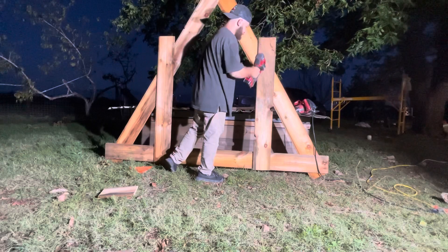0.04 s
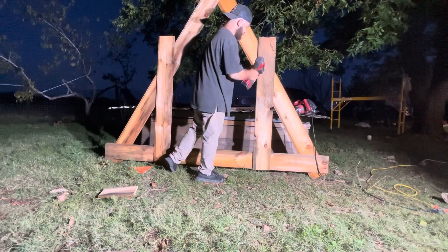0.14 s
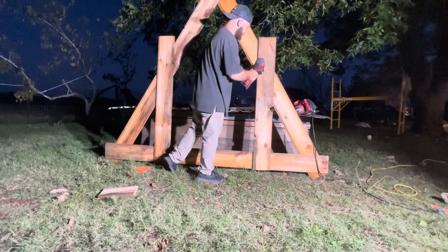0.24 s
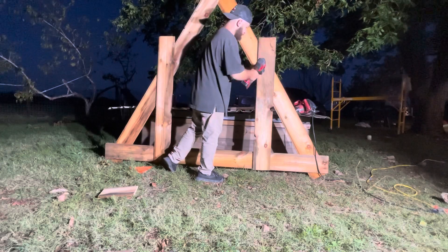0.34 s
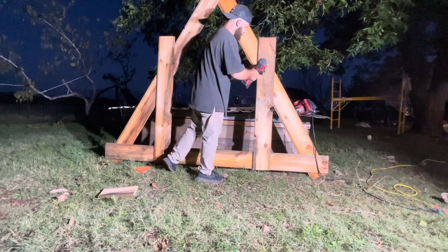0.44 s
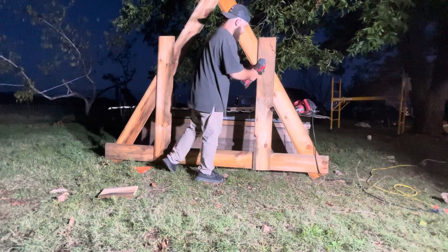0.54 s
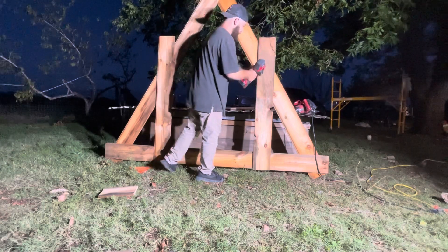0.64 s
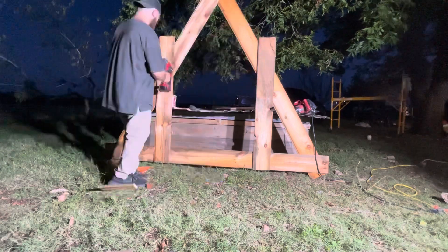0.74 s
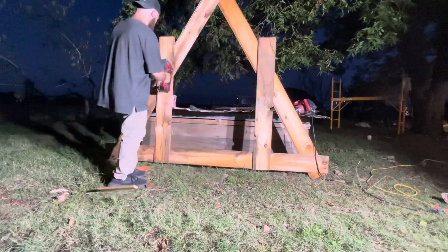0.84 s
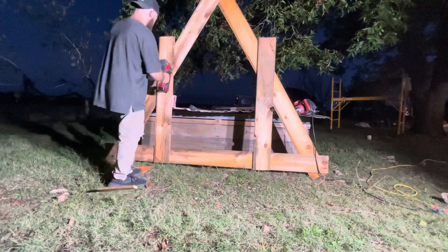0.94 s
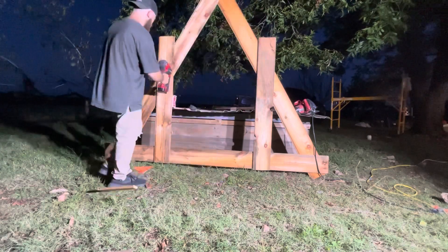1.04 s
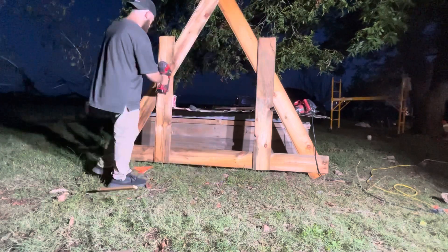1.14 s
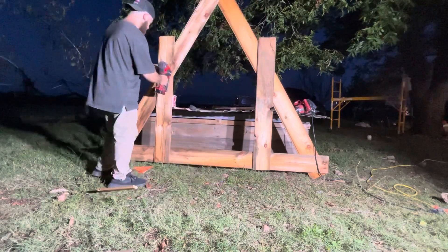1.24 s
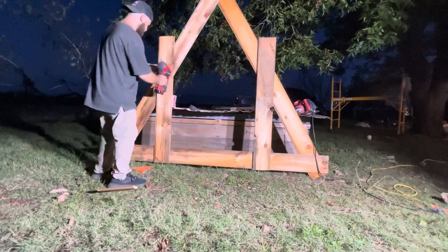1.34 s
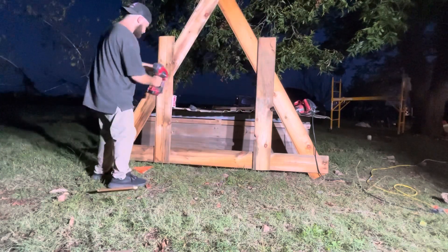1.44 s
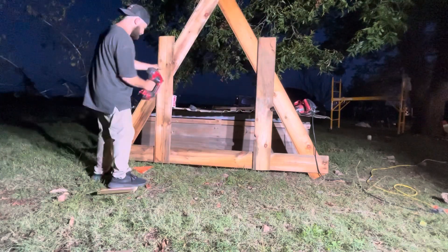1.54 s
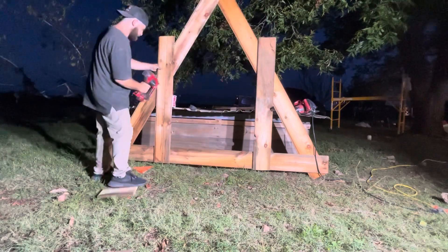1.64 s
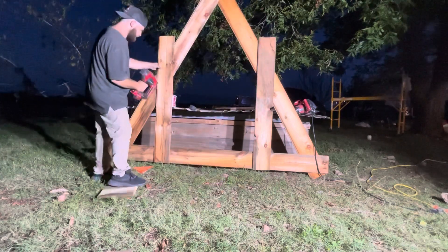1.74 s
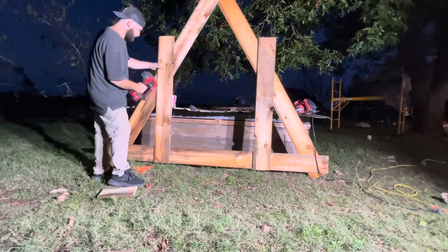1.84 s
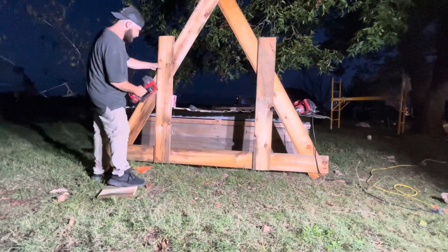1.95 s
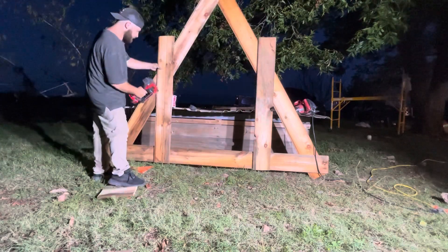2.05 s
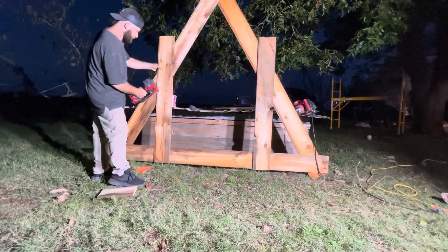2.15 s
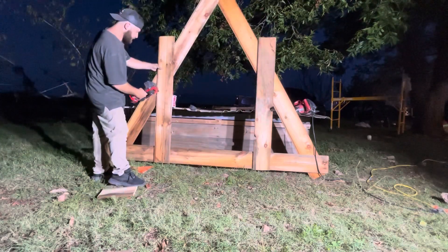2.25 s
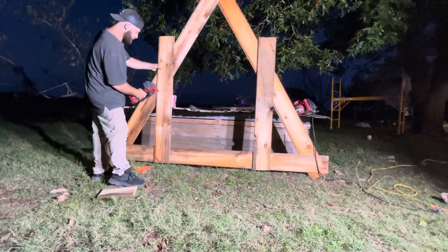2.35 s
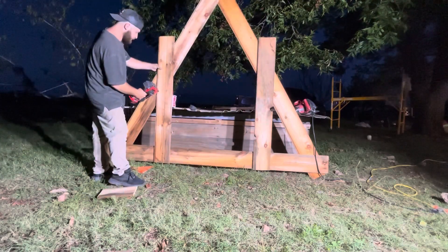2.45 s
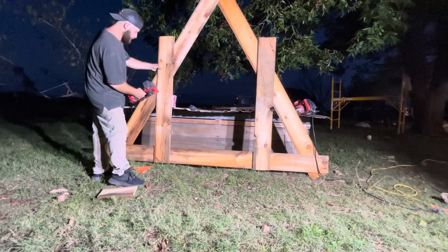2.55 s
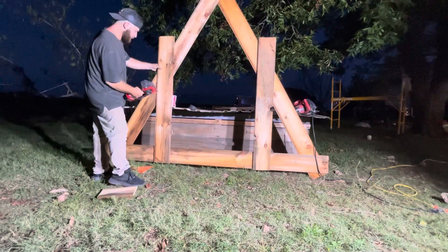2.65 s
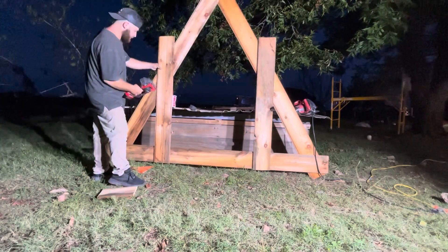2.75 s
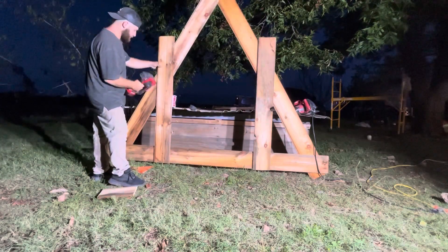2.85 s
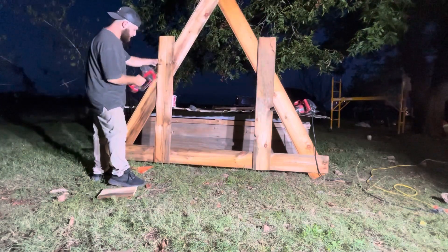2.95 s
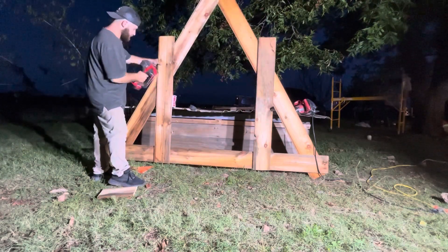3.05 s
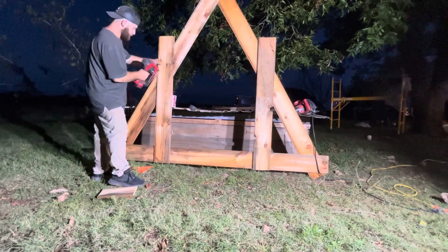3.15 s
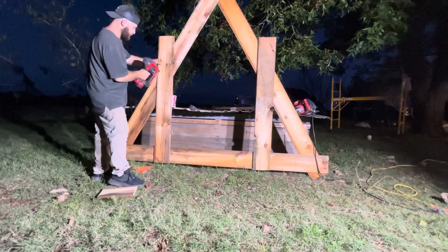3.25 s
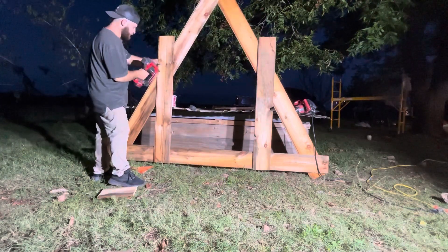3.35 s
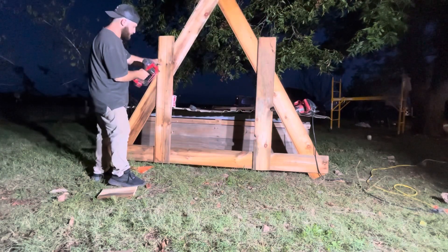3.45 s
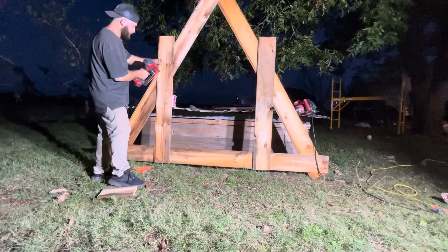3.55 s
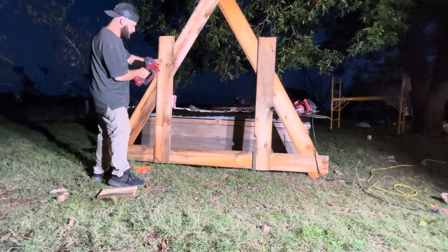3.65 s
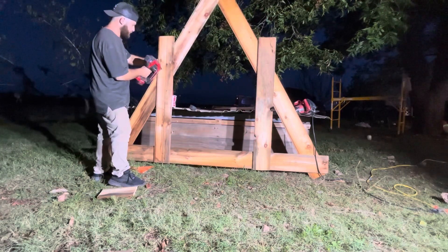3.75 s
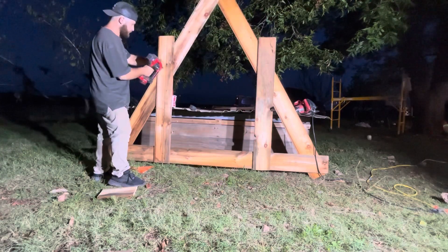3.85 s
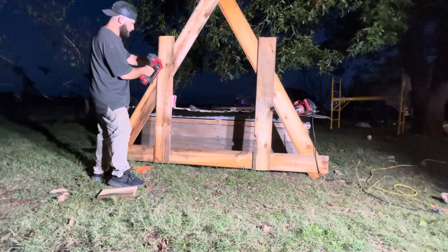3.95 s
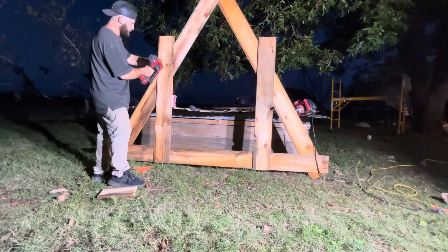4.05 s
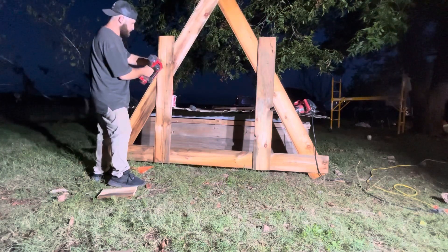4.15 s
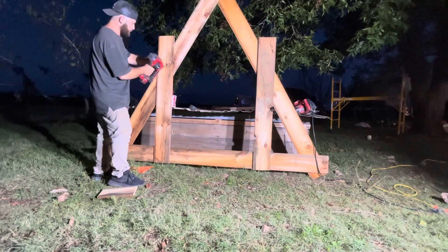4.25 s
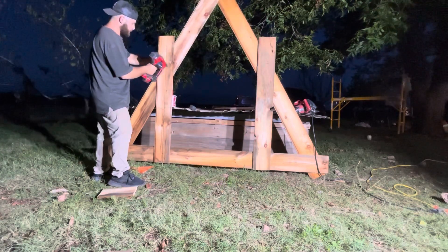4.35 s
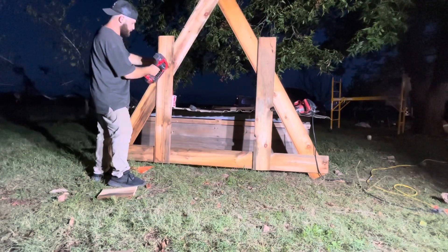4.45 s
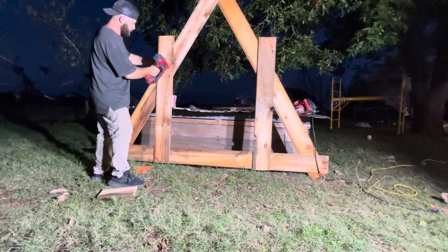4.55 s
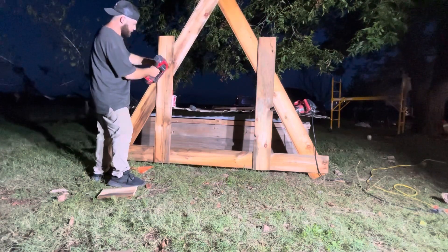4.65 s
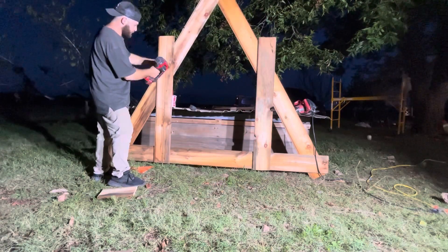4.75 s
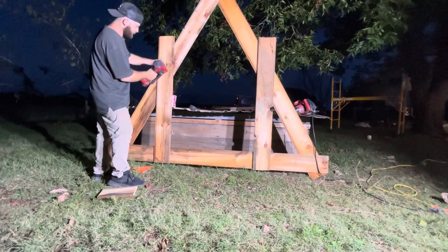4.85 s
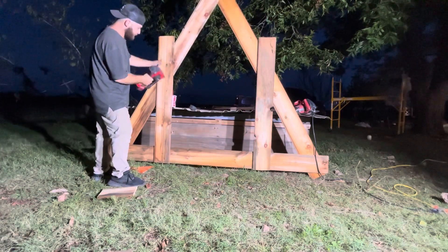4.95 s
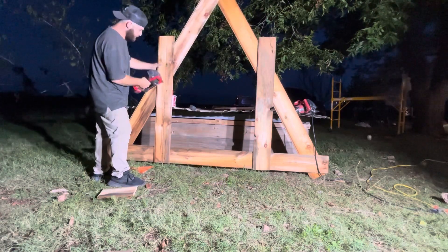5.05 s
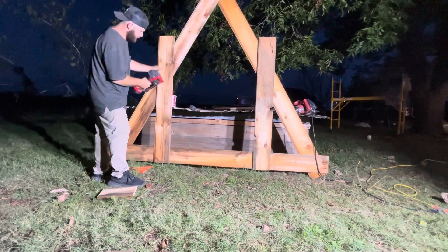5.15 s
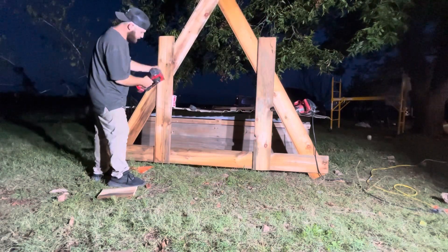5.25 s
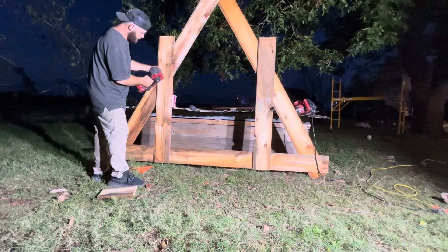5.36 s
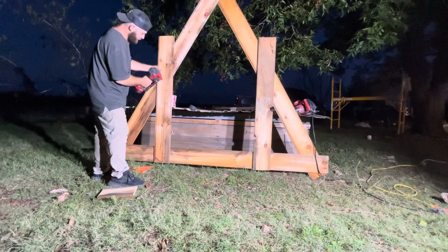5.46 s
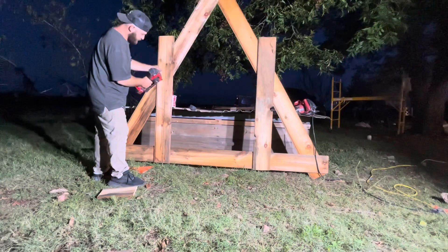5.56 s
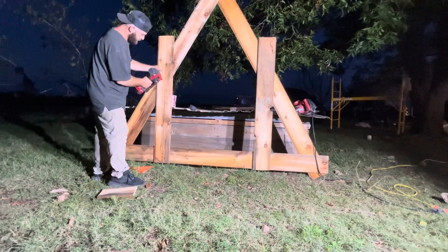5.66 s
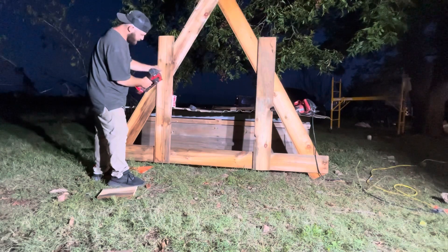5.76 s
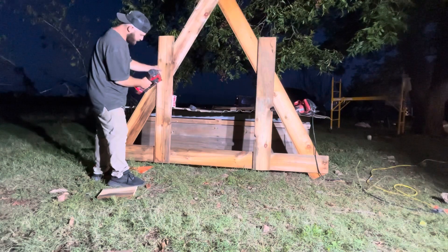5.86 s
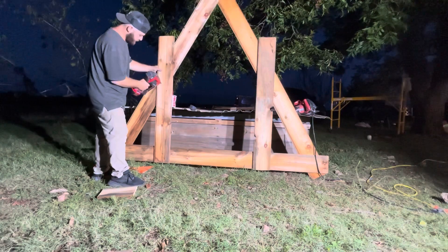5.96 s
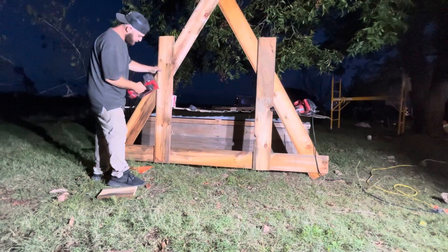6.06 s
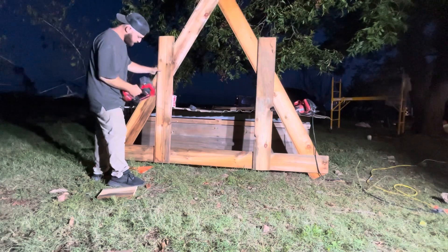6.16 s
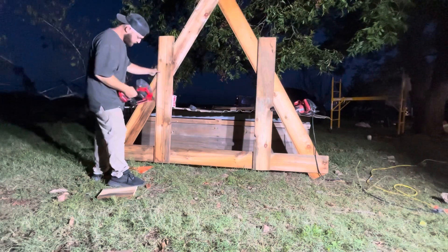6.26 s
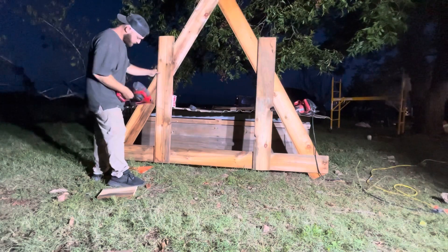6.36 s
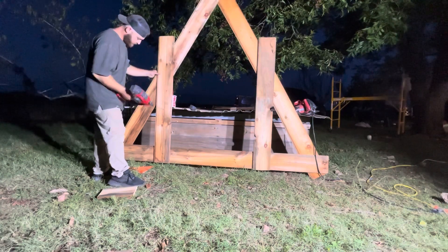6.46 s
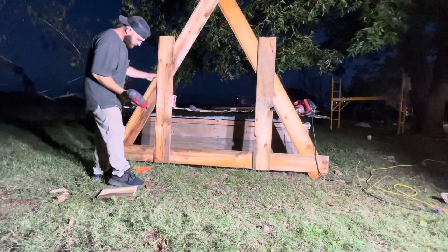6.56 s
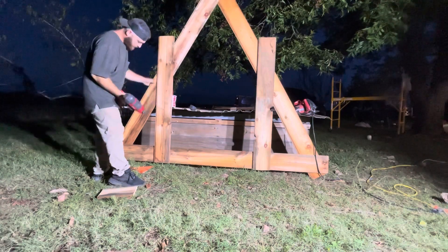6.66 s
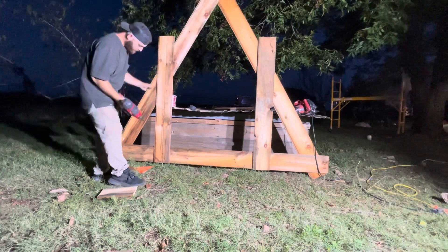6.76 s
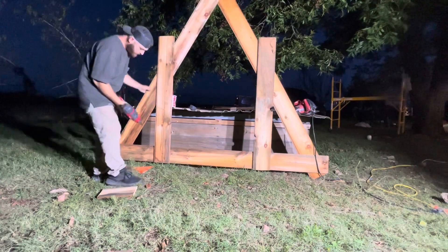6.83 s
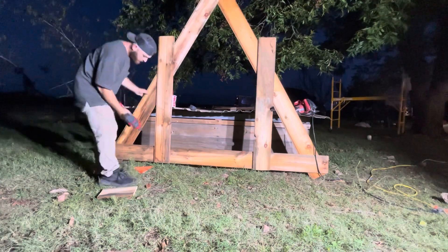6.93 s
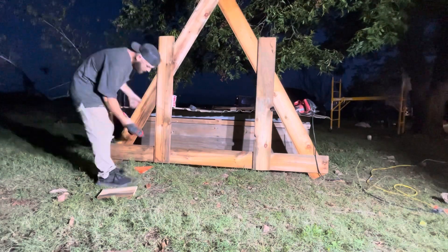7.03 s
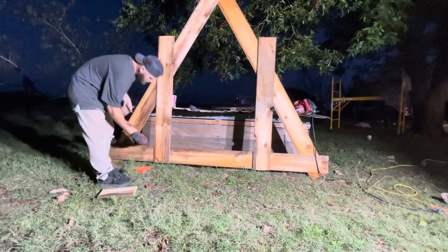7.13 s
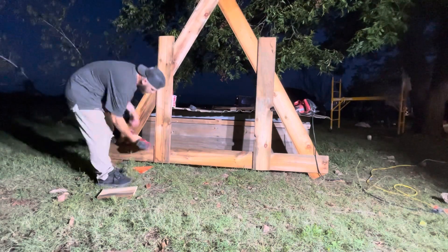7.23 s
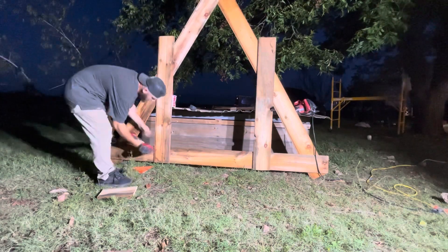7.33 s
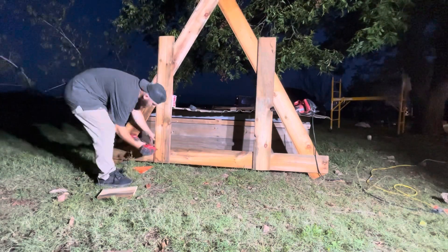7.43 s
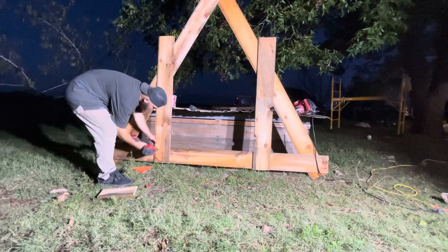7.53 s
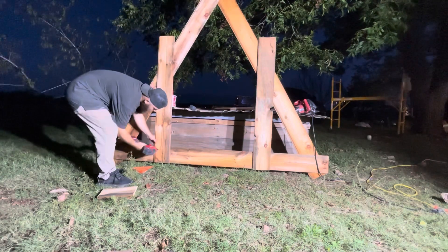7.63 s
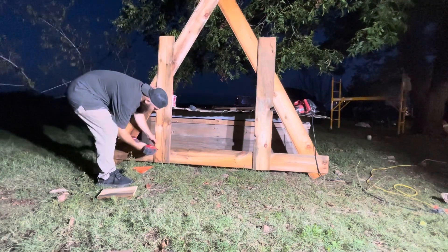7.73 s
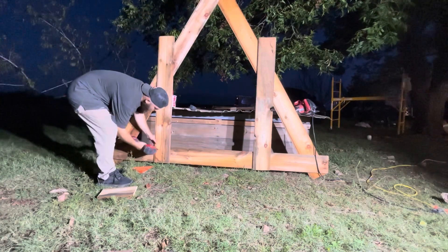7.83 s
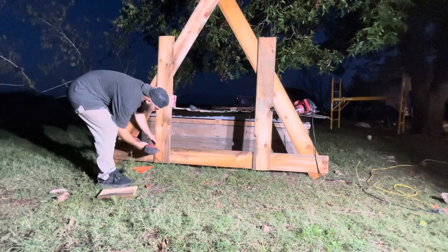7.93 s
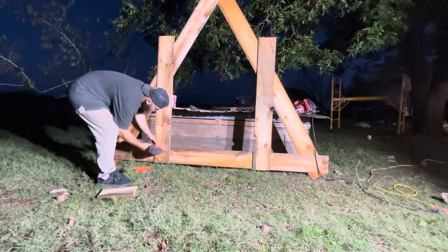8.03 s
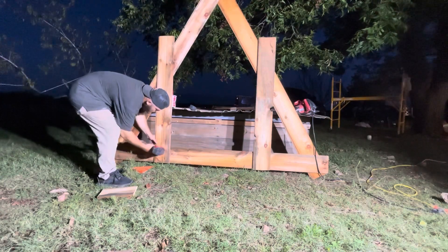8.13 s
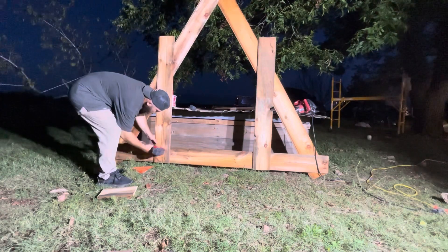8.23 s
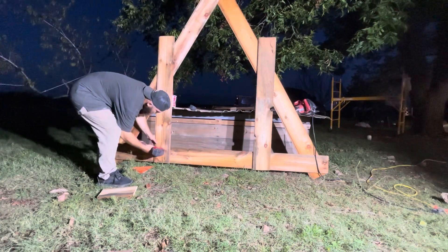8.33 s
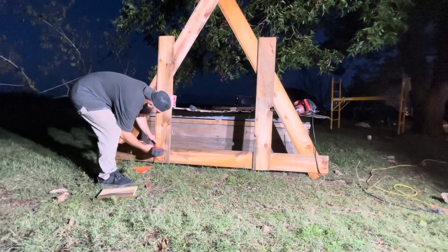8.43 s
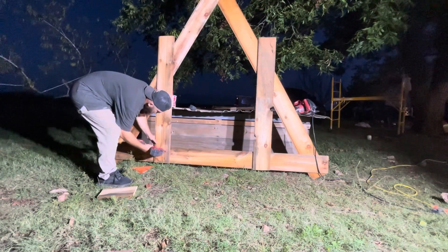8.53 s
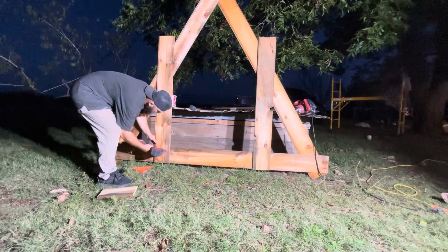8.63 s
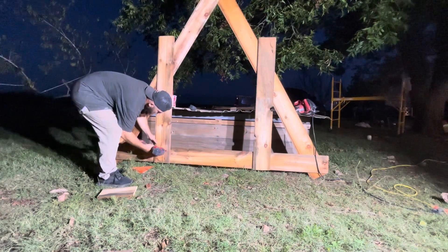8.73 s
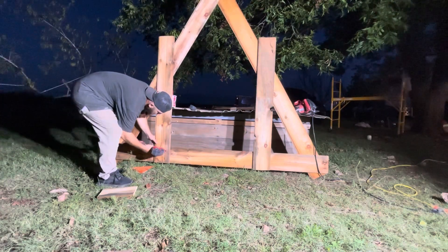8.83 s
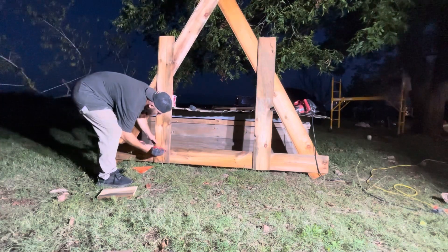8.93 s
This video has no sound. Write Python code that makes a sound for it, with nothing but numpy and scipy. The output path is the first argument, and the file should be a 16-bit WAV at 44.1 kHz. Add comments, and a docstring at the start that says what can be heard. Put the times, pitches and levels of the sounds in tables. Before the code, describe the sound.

Cordless nailer drives nails into a wooden frame in a yard: clack, climbing whirr, hard crack, rattle, dying hiss, faint distant insects.

```python
"""A yard at night: a battery nail gun works along a timber frame, insects trill far off.
Each cycle: nose clack, motor whine climbing, a shot of shaped noise and struck modes, rattle, flywheel hiss dying.
Contacts ring decaying sines of steel and timber; whirr, shudder and night are filtered noise."""
import sys
import numpy as np
from scipy import signal
from scipy.fft import rfft, irfft, next_fast_len
from scipy.io import wavfile
from scipy.ndimage import uniform_filter1d, map_coordinates

SR = 44100
rng = np.random.default_rng(int(sys.argv[2]) if len(sys.argv) > 2 else 0)


def master(y):
    """Save y as 16-bit WAV."""
    cut = np.clip(np.atleast_2d(y).T, -1, 1)
    pcm = np.round(cut * 32767)  # scale
    wavfile.write(sys.argv[1], SR, pcm.astype(np.int16))


N = 396459
T = np.arange(SR // 2) / SR  # s, time axis of one event


def amp(db):
    """dB to amplitude factor."""
    return 10 ** (np.asarray(db) / 20)


def unit(x):
    """x at rms 1."""
    return x / np.sqrt(np.mean(x ** 2) + 1e-20)


def along(points, hz):
    """Interpolates (f/Hz, value) points on a log frequency axis."""
    f, v = np.transpose(points)
    return np.interp(np.log(hz + 1), np.log(f + 1), v)


def wobble(rate_hz, count=N):
    """Smooth random curve, rate_hz knots a second."""
    knots = rng.standard_normal(int(count * rate_hz / SR) + 4)
    return map_coordinates(knots, [np.arange(count) * rate_hz / SR])


def filtered(x, response):
    """Multiplies the spectrum of x by response(Hz)."""
    m = next_fast_len(x.shape[-1] + 8192)
    return irfft(rfft(x, m) * response(np.fft.rfftfreq(m, 1 / SR)), m)[..., :x.shape[-1]]


LEVEL_HZ = 12500  # spectra are flat above this


def noise(spectrum, count=N):
    """Two unrelated noises of one colour, rms 1."""
    colour = lambda hz: amp(along(spectrum, np.minimum(hz, LEVEL_HZ)))
    return unit(filtered(rng.standard_normal((2, count)), colour))


def patchy(x, depth_db):
    """Random gain in small patches of time and frequency."""
    z = signal.stft(x, nperseg=512)[2]
    field = uniform_filter1d(rng.standard_normal(z.shape[1:]), size=3, axis=0)
    field = uniform_filter1d(field, size=10, axis=1)
    return unit(signal.istft(z * amp(depth_db * unit(field)), nperseg=512)[1][:, :N])


def ring(modes, attack_s, detune=0.0044, count=len(T)):
    """Struck modes as decaying sines, strength and pitch redrawn at every blow."""
    t = T[:count]
    strength_db, shift = rng.standard_normal((len(modes), 2)).T * [[2.5], [detune]]
    tones = 0
    for (hz, db, t60), more_db, bend in zip(modes, strength_db, shift):
        tones = tones + amp(db + more_db - 60 * t / t60) * np.sin(2 * np.pi * hz * (1 + bend) * t)
    return tones * (1 - np.exp(-t / attack_s))


def add(track, s, sound):
    """Lays a sound into the track at s seconds."""
    part = track[:, max(round(s * SR), 0):][:, :sound.shape[-1]]
    part += (np.ones((2, 1)) * sound)[:, :part.shape[1]]


GRIP_S, DRIVE_S = .015, .011  # driver grips the flywheel before meeting the nail; stroke into the wood
# noise colour of the drive: f/Hz, level/dB
BLAST_SPECTRUM = [(88, -50), (150, -17.5), (432, -1.5), (767, -3), (1900, -5), (3640, -9.5), (4070, -9),
                  (5370, -15), (6230, -14.5), (11300, -22.5), (12600, -24.5)]


def drive_blast(t):
    """Driver grinds up to speed and rams the nail: noise through the gun's body."""
    times_s = [-.015, -.006, -.002, .002, DRIVE_S, DRIVE_S + 0.0038, DRIVE_S + 0.047]
    level_db = np.interp(t, times_s, [-43, -22.5, -9.0, -0.5, -1.5, -13, -43.0])
    gain = amp(level_db + 3.2 * wobble(900, count=len(T))) * (t < DRIVE_S + .03)
    return gain * body(noise(BLAST_SPECTRUM, count=len(T)))


# noise colour of the return: f/Hz, level/dB
RATTLE_SPECTRUM = [(120, -31.5), (200, -7), (547, -2), (787, -4.5), (2940, -9), (4010, -7.5), (4610, -5.5),
                   (5680, -7.5), (6300, -11), (12600, -20.5)]


def driver_return(t, slaps_s, rattle_db):
    """Driver chatters back along its guide: noise through the body, bursting at each slap."""
    level_db = np.interp(t, [0, DRIVE_S, .055, .068, .12, .3], [-38.0, 2.5, -0.5, -8.5, -19.0, -53.0])
    gain = amp(rattle_db + level_db + 3 * wobble(150, count=len(T))) * (t < .3)
    chatter = sum(amp(14 - 60 * np.abs(t - slap) / .012) * (t > slap) for slap in slaps_s)
    return gain * body(noise(RATTLE_SPECTRUM, count=len(T))) * (0.89 + 0.054 * chatter)


# shots: t/s, level/dB, timber thump/dB, rattle/dB, weight below 1.4 kHz/dB, left-right/dB
SHOTS = [(0.599, -5, -25, -21.5, -1.5, 3), (1.376, -1.5, -26.5, -19, -5.5, 3.5),
         (2.493, -1, -28.5, -22.5, -7, 4), (3.579, -1, -30, -22, -7.5, 3.5),
         (4.179, -0.5, -30.5, -21.5, -8, 3), (4.781, 0.5, -31.5, -21.5, -8, 3.5),
         (5.85, 0, -29, -23, -11.5, 4), (7.821, -1.5, -21, -20.5, -14, 3)]
# driver modes: f/Hz, level/dB, t60/s
DRIVER_STEEL = [(2260, -7.5, 0.036), (4650, -3, 0.075), (4540, -9, 0.06), (7060, -6.5, 0.017)]
# frame modes: f/Hz, level/dB, t60/s
TIMBER = [(58, -10.5, 0.14), (93.4, -6.5, 0.2), (126, 2, 0.085), (166.8, 1.5, 0.13), (184, -1, 0.074),
          (259, -4, 0.11), (318, -5, 0.13), (469.5, 0.5, .08), (636, -5, 0.049), (1090, -10, 0.012)]
# nose piece modes: f/Hz, level/dB, t60/s
NOSE = [(410, -20, 0.1), (620, -12, 0.06), (983, -12, 0.05), (1280, -7, 0.03), (1920, -1.5, 0.02),
        (2500, -7, .02), (3090, -12, 0.02), (4085, -20, 0.022), (6420, -21, 0.027)]
BITE_DB, SLAP_DB = -11, -7  # nose rings: nail bites in steps; driver slaps its stops
SEAT_HZ = 800  # below this the beam answers only as the nail seats
CRACK_DB, CRACK_T60_S = -16, 0.014  # bright crack as the nail seats


def shots():
    """Driver rams the nail, strikes nose, steel and timber modes, then rattles back."""
    out = np.zeros((2, N))
    t = T - GRIP_S
    for s, db, thump_db, rattle_db, weight_db, _ in SHOTS:
        slaps_s = rng.uniform(DRIVE_S + .008, .058, 4)
        blast = drive_blast(t)
        back = driver_return(t, slaps_s, rattle_db)
        for bite in rng.uniform(-.003, DRIVE_S, 4):
            nose = ring(NOSE[3:], attack_s=0.00064, detune=.15, count=SR // 10)
            add(out, s + bite, amp(db + BITE_DB) * nose)
        for slap in slaps_s:
            nose = ring(NOSE, attack_s=0.00025, detune=.15, count=SR // 10)
            add(out, s + slap, amp(db + rattle_db + SLAP_DB) * nose)
        weight = lambda hz: amp(weight_db / (1 + (hz / 1400) ** 4))  # how freely the struck beam moves
        lows = filtered(blast, lambda hz: 1 / (1 + (hz / SEAT_HZ) ** 4))
        held_lows = lows * np.clip(1 - t / DRIVE_S, 0, 1)
        add(out, s - GRIP_S, amp(db - 11.0) * filtered(blast - held_lows + back, weight))
        crack = unit(np.diff(noise(BLAST_SPECTRUM, count=len(T) + 2), n=2)) * amp(-60 * T / CRACK_T60_S)
        add(out, s + DRIVE_S - .005, amp(db + CRACK_DB) * crack)
        steel = amp(db - 15.5) * ring(DRIVER_STEEL, attack_s=0.00068)
        thump = amp(db + thump_db) * ring(TIMBER, attack_s=0.000084, detune=0.1)
        add(out, s + DRIVE_S - .004, steel + thump)
    return out


# gun resonances under load: f/Hz, width/Hz, level/dB
BODY = [(524, 230, 10.5), (1077, 160, 4.5), (2167, 400, 0.5), (2760, 230, 0), (4756, 63, 4.5),
        (6400, 270, 0), (11800, 230, -7.5)]


def body(x):
    """Gun's resonances, each a little stronger or weaker at every call."""
    gains = amp(np.transpose(BODY)[2] + 2.5 * rng.standard_normal(len(BODY)))
    peaks = lambda f: sum(g / (1 + (2 * (f - c) / w) ** 2) for g, (c, w, _) in zip(gains, BODY))
    return filtered(x, lambda f: 1.307 + peaks(f))


# nose and trigger clicks: t/s, level/dB, timber thump/dB, t60/s, brightness/dB
CLICKS = [(0.267, -20, -3, 0.23, -44), (0.312, -23, 11, 0.25, -21.5), (0.784, -34, -18, 0.32, -15.5),
          (0.862, -36.5, -26, 0.14, -15.5), (0.889, -30, -27, 0.16, -9), (1.041, -20, -13, 0.14, -23),
          (1.06, -31.5, -2, 0.084, -23), (1.099, -36.5, -13, 0.054, -11.5), (2.076, -16.5, -28, 0.19, -35),
          (2.204, -55, 3, 0.1, -1), (2.217, -55, -8, 0.054, -13.5), (3.218, -16.5, -15, 0.23, -23),
          (3.299, -43, -5, 0.13, -7), (3.875, -20, 8.5, 0.32, -16.5), (3.897, -25, 2, .12, -27),
          (4.477, -17, -7, 0.2, -16), (4.5, -26, -13, 0.07, -26), (5.5268, -10.5, -30, 0.21, -26),
          (6.931, -57.5, -20, 0.88, -5.5), (6.978, -51.5, -25.5, 0.138, -4), (7.054, -61, -15, 0.39, 4.5),
          (7.454, -48.5, -20, 0.147, -10), (7.47, -19, -9, 0.21, -15.5), (7.501, -47.5, -27, 0.056, -8),
          (7.531, -41.5, -22, 0.092, -7.5), (8.092, -18.5, -3, 0.19, -12.5), (8.119, -26.5, 0, 0.2, -6),
          (8.416, -52.5, -26, 0.23, 1.5), (8.433, -42, -25.5, 0.073, -4), (8.455, -39, -26, 0.15, 4.5),
          (8.666, -27, 8.5, 0.24, -7), (8.698, -32, -17, 0.07, -11), (8.723, -33, 5, 0.08, -17.5)]
# noise colour of a clack: f/Hz, level/dB
CLACK_SPECTRUM = [(120, -30), (200, -8.5), (1260, -14), (1570, -2), (1940, -11.5), (2430, -2), (2690, -5.5),
                  (5780, -12), (6410, -13), (12600, -29.5)]
# noise colour of struck timber: f/Hz, level/dB
RAP_SPECTRUM = [(200, -23), (450, 0.5), (1000, -6.5), (2000, -14), (3500, -28), (12000, -55.5)]
CLACK_RISE_S, TICK_T60_S, TAIL_DB = 0.0017, .03, -9  # rise, sharp part, scrape left after it
WOODY_DB, WOODY_T60_S = -14.5, 0.13  # rap of the beam under a clack
REBOUND_S, REBOUND_DB = .005, -7.5  # nose piece strikes twice


def clicks():
    """Nose piece clacks and rebounds; noise and nose modes, then the timber answers."""
    out = np.zeros((2, N))
    rise = 1 - np.exp(-T / CLACK_RISE_S)
    tick = amp(-60 * T / TICK_T60_S) + amp(TAIL_DB)
    for s, db, thump_db, t60, bright_db in CLICKS:
        decay = amp(-60 * T / t60 + 1.6 * wobble(260, count=len(T)))
        scrape = noise(CLACK_SPECTRUM, count=len(T)) * decay * rise
        clack = .6 * scrape * tick + 2.3 * ring(NOSE, attack_s=.0004, detune=.05)
        treble = signal.lfilter([1, -.75], 1, clack) * amp(bright_db + 23)  # hard contacts add treble
        thump = ring(TIMBER, attack_s=0.0049, detune=0.048)
        add(out, s, amp(db - 13) * (0.88 * clack + treble) + amp(db + thump_db - 17.5) * thump)
        rap = rise * noise(RAP_SPECTRUM, count=len(T))
        add(out, s, amp(db + WOODY_DB - 60 * T / WOODY_T60_S) * rap)
        rebound = ring(NOSE, attack_s=0.00062, detune=0.109, count=SR // 10)
        add(out, s + REBOUND_S, amp(db - 5.5 + REBOUND_DB) * rebound)
    return out


# dull knocks of the tool on the frame: t/s, boom level/dB, rap level/dB, boom f/Hz
KNOCKS = [(0.327, -29.5, -38.5, 160), (0.801, -40, -36.5, 201), (1.065, -41, -31.5, 187),
          (1.084, -29.5, -38, 206), (2.099, -35, -43, 155), (3.244, -27, -41.5, 112),
          (3.338, -27, -29.5, 266), (3.402, -29, -38, 217), (3.77, -33, -42, 221), (3.977, -26, -33, 264),
          (4.407, -36, -49, 164), (4.497, -27.5, -32, 124), (4.59, -26.5, -30.5, 254),
          (4.655, -27.5, -32.5, 199), (5.542, -25.5, -26.5, 180), (5.646, -28.5, -31, 267),
          (5.716, -34, -40, 254), (6.05, -36.5, -61, 197), (7.53, -31.5, -52, 140),
          (7.986, -34.5, -52, 197), (8.121, -20.5, -30, 176), (8.214, -33, -41.5, 107),
          (8.598, -48, -62, 139.6), (8.696, -21, -31.5, 129), (8.728, -23, -37, 133),
          (8.799, -31.5, -36.5, 213)]


def knocks():
    """Soft contacts: beam booms at a pitch set by the place, over timber modes and a woody rap."""
    out = np.zeros((2, N))
    for s, db, rap_db, boom_hz in KNOCKS:
        rap = noise(RAP_SPECTRUM, count=len(T))
        boom = ring([(boom_hz, 0, .16)], attack_s=0.0016)
        boom = boom + 0.5 * ring(TIMBER, attack_s=0.0022, detune=0.076)
        add(out, s, amp(db - 4.0) * boom + amp(rap_db - 4.5 - 60 * T / 0.16) * rap)
    return out


# motor runs: stall t/s, head start/s, shaft hum/dB, whine/dB, housing/dB, driver ring/dB,
# whirr/dB, free coast/s, frame shudder/dB
SPINS = [(-.25, .01, -56, 0, 1.5, -23.5, -45, .7, -38), (0.596, 0.013, -57, -8, 2, -25, -46.5, 0.14, -43),
         (1.375, .025, -57, -4.5, 3, -8, -45.5, 0.57, -38.5),
         (2.496, 0.015, -63, -6.5, -0.5, -9, -44, 0.41, -40.5),
         (3.581, 0.016, -55, -4.5, -5, -2.5, -42.5, .5, -39),
         (4.181, 0.0038, -52, -3, -7, -11, -43, 0.47, -44),
         (4.781, 0.00097, -56, -9, 4, -2.5, -44.5, .45, -40),
         (5.852, 0.0051, -52.5, -5, 3, -13, -43, 0.45, -42.5), (7.822, 0, -32, -2.5, 0, -9, -46, .3, -45),
         (9.03, 0.032, -36, -5.5, -3, -18, -44, .5, -50)]
# whine pitch: t before full speed/s, f/Hz
WINDUP = [(-.24, 560), (-.15, 1230), (-.1, 1630), (-.05, 1900), (0, 2100)]
# whine swell: t before stall/s, level/dB
WHINE_SWELL = [(-.26, -30), (-.2, -6), (-.12, -2), (0, 0)]
# whine partials: order, level/dB
WHINE = [(1, -56.5), (2, -63.5), (3, -65), (.5, -59)]
# where the housing lets the whine out: f/Hz, width/Hz, level/dB
GLOW = [(1960, 800, 13), (3150, 700, 6), (3850, 400, 8), (4500, 600, 8), (5500, 800, 11)]
# hum partials: order of the shaft, level/dB
HUM = [(1, -1), (3, -19), (4, -16.5), (6, -21.5), (8, -25.5)]
SHAFT_RATIO, HUM_DB_PER_S = 15.2, 110  # whine cycles a turn; swell of the hum


def windup():
    """Motor whine, overtones and shaft hum climb until the stall."""
    out = np.zeros((2, N))
    t = T + WHINE_SWELL[0][0]
    glow_db = lambda f: sum(db / (1 + (2 * (f - c) / w) ** 4) for c, w, db in GLOW)
    for s, early, hum_db, whine_db, *_ in SPINS[1:]:
        hz = np.interp(t + early, *np.transpose(WINDUP))
        phase = 2 * np.pi * np.cumsum(hz * (1 + .009 * wobble(150, count=len(T)))) / SR
        tones = 0
        for order, db in WHINE:
            gain = amp(db + glow_db(order * hz) + 2 * wobble(45, count=len(T)))
            tones = tones + gain * np.sin(order * phase)
        hum = sum(amp(db) * np.sin(order * phase / SHAFT_RATIO) for order, db in HUM)
        whine = amp(whine_db + np.interp(t, *np.transpose(WHINE_SWELL))) * tones
        add(out, s + t[0], (t < 0) * (whine + amp(hum_db + HUM_DB_PER_S * t) * hum))
    return out


# noise colour of the flywheel: f/Hz, level/dB
WHIRR_SPECTRUM = [(210, -36), (350, -7), (1290, -8.5), (2120, -8), (2420, -9.5), (4030, -14), (4680, -10.5),
                  (5360, -12.5), (6130, -12), (12600, -21.5)]
# noise colour of the shaking frame: f/Hz, level/dB
RUMBLE_SPECTRUM = [(15, -35.5), (25, -20.5), (49, -2.5), (134, -1.5), (205, -0.5), (274, -8.5),
                   (331, -16.5), (500, -14.5), (650, -49), (1100, -120)]
# loose housing bands: f/Hz, width/Hz, level/dB
HOUSING = [(980, 35, -13), (1130, 50, -11), (1480, 160, -8.5), (1790, 90, -13), (2120, 130, -6),
           (5000, 350, -14), (6150, 400, -7), (6760, 74, -16), (7000, 160, -14), (8500, 250, -17),
           (12400, 160, -23)]
# driven wheel blurs the driver's ring into a band: f/Hz, width/Hz, level/dB
HOWL = (4530, 220, -14)
# steel driver rings along with the turning wheel: f/Hz, width/Hz
DRIVER_BAND = (4640, 45)
RING_AFTER_S, RING_DIES_DB_PER_S = .25, 300  # driver falls silent this long after the coast ends
TREBLE_HZ = 3600  # whirr splits here


def resonant_noise(centre_hz, width_hz):
    """Noise through one resonance, rms 1."""
    response = lambda f: 1 / (1 + (2 * (f - centre_hz) / width_hz) ** 2)
    return unit(filtered(rng.standard_normal((2, N)), response))


def running():
    """Flywheel and belt hiss; loose housing sings in narrow bands after a shot; frame shudders in lumps."""
    t = np.arange(0, N + 64, 64) / SR  # control steps
    smooth = lambda values: np.interp(np.arange(N) / SR, t, values)
    runs = np.transpose(SPINS)
    stalls = runs[0]
    last = np.searchsorted(stalls, t) - 1
    since = t - stalls[last]
    housing_db = runs[4, np.searchsorted(stalls + SPIN_UP[1][0], t) - 1]
    ring_db, coast = runs[[5, 7]][:, last]
    driven = sum(np.interp(t - s, [-.24, -.18, 0], [0, 1, 1], right=0) for s in stalls)
    ring_db = ring_db - RING_DIES_DB_PER_S * np.maximum(since - coast - RING_AFTER_S, 0) - 20 * driven
    singing_db = np.interp(since, [0, .05, .2, .7, .95], [-8.0, -9.5, -5.5, -9.5, -11.5])
    # a driven motor holds the housing tight
    held_db = sum(np.interp(t - s, [-.31, -.16, 0], [0, -7, -9], right=0) for s in stalls)
    singing = amp(smooth(singing_db + held_db + housing_db))
    ringing = amp(smooth(ring_db))
    whirr, treble, shudder = [amp(smooth(db)) for db in flywheel(t)]
    bands = sum(amp(db + 4 * wobble(8)) * resonant_noise(c, w) for c, w, db in HOUSING)
    hiss = patchy(noise(WHIRR_SPECTRUM), depth_db=2.5) * amp(0.52 * wobble(27) + wobble(160))
    low = filtered(hiss, lambda hz: 1 / (1 + (hz / TREBLE_HZ) ** 4))
    driver = amp(3 * wobble(8) - 3) * resonant_noise(*DRIVER_BAND)[0]
    howl = amp(HOWL[2] + 3 * wobble(20)) * smooth(driven) * resonant_noise(*HOWL[:2])
    wheel = (low + howl + singing * bands + ringing * driver * [[1], [.6]]) * whirr
    rumble = noise(RUMBLE_SPECTRUM) * shudder * amp(0.87 * wobble(24))
    return wheel + (hiss - low) * treble + rumble


# whirr as the wheel gathers speed: t before stall/s, level/dB
SPIN_UP = [(-.33, -32), (-.26, -16.5), (-.16, -6.5), (0, 0.5)]
STALL_DB, STALL_S = 9.5, 0.062  # what the shot takes out of the whirr, and how soon
COAST_DB_PER_S = 9  # free wheel fading
BRAKE_DB_PER_S, BRAKE_TREBLE_DB_PER_S = 13, 67.5  # added once the coast ends; treble dies faster
SHUDDER_DB_PER_S, SHUDDER_RISE_S = 36, 0.13  # frame shaking: fade, build-up under the motor
KNOCK_SHUDDER_DB, RECOIL_DB = -10.5, 11  # shaking after a knock; shot's jolt above the motor's shaking


def flywheel(t):
    """Whirr, treble and shudder levels in dB from spin-up, coast and brake; the loudest run or knock rules."""
    stall, *_, full_db, coast, shake_db = np.transpose(SPINS)[..., None]
    after = np.maximum(t - stall, 0)
    braking = np.maximum(after - coast, 0)
    whirr_db = full_db + np.interp(t - stall, *np.transpose(SPIN_UP), left=-120)
    whirr_db = whirr_db - STALL_DB * np.minimum(after / STALL_S, 1)
    whirr_db = whirr_db - COAST_DB_PER_S * after - BRAKE_DB_PER_S * braking
    treble_db = whirr_db - BRAKE_TREBLE_DB_PER_S * braking
    rise_db = np.interp(t - stall, [-2 * SHUDDER_RISE_S, -SHUDDER_RISE_S, 0], [-60, -6, 0], left=-120)
    driven_db = shake_db - SHUDDER_DB_PER_S * after + rise_db - RECOIL_DB * (t < stall)
    s, boom_db = np.transpose(KNOCKS)[:2, :, None]
    knocked_db = boom_db + KNOCK_SHUDDER_DB - 2 * SHUDDER_DB_PER_S * (t - s)
    knocked_db = np.where(t > s, knocked_db, -120)
    shudder_db = np.vstack([driven_db, knocked_db])
    return whirr_db.max(axis=0), treble_db.max(axis=0), shudder_db.max(axis=0)


# noise colour of the far chorus: f/Hz, level/dB
INSECT_SPECTRUM = [(2300, -120), (2450, -1), (2620, -3), (2760, -5), (2900, -120)]
# noise colour of still air: f/Hz, level/dB
NIGHT_SPECTRUM = [(18, -38.5), (30, -8.5), (59, 2), (270, -20.5), (299, -10), (395, -29.5), (1940, -33),
                  (2560, -6), (2980, -27.5), (4040, -33), (12600, -46)]


def night():
    """Far insect chorus, a wavering noise band, over steady still-air noise."""
    chorus = amp(-77.5 + 1.5 * wobble(3.3) + 2.2 * wobble(45)) * noise(INSECT_SPECTRUM)
    return chorus + amp(-62.5) * noise(NIGHT_SPECTRUM)


# stereo likeness: f/Hz, left-right correlation
ALIKE = [(60, .99), (300, .95), (600, .6), (1650, .75), (4500, .62), (9500, .45), (10600, .99)]


def scene():
    """Sums the sources; row 0 is what left and right share, row 1 feeds their difference."""
    sound = shots() + clicks() + knocks() + windup() + running() + night()
    angle = lambda hz: np.arccos(np.clip(along(ALIKE, hz), -1, 1)) / 2
    mid, side = filtered(sound, lambda hz: np.array([np.cos(angle(hz)), np.sin(angle(hz))]))
    s, pan_db = np.transpose(SHOTS)[[0, -1]]
    # the gun moves about the frame
    lean = amp(np.interp(np.arange(N) / SR, s, pan_db - np.mean(pan_db)) / 2)
    return np.array([(mid + side) * lean, (mid - side) / lean])


# left-right level of the sound: f/Hz, left-right/dB
SIDES = [(60, 3.5), (400, 2.5), (1400, 0.5), (2500, 0), (6000, -1.5), (9300, -3), (10500, 0)]
# left-right phase of the sound: f/Hz, left lead/rad; opposite at the top
LEAD = [(300, 0), (2100, .7), (4800, 1.2), (5500, 2.2), (6900, -.6), (8300, 1.4), (9600, -2), (10500, 0),
        (12800, 0), (13500, np.pi)]
# treble of both sides: f/Hz, level/dB
AIR = [(12500, -0.5), (13400, -3)]
DIP_S, DIP_HALF_S, DIP_DB = .78, .008, -28  # the level dips briefly
TOP_HZ = 15850  # band limit


def record(dry):
    """Left and right differ in level and phase by frequency; deep bass thinned, level dip, rounded peaks, band limit."""
    left = lambda hz: amp(along(SIDES, hz) / 2) * np.exp(1j * along(LEAD, hz) / 2)
    colour = lambda hz: amp(along(AIR, hz)) / np.sqrt(1 + (45 / (hz + 1)) ** 6)
    x = filtered(dry, lambda hz: colour(hz) * np.array([left(hz), 1 / left(hz)]))
    x = x * amp(np.interp(np.arange(N) / SR - DIP_S, [-DIP_HALF_S, 0, DIP_HALF_S], [0, DIP_DB, 0]))
    x = x / (1 + np.abs(x / .93) ** 5) ** (1 / 5)
    return filtered(x, lambda hz: hz < TOP_HZ)


dry = scene()
out = record(dry)
master(out)
```